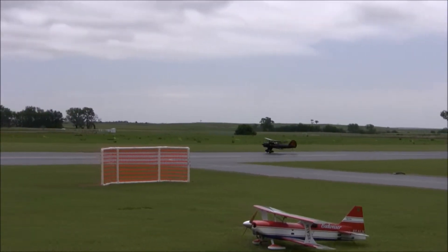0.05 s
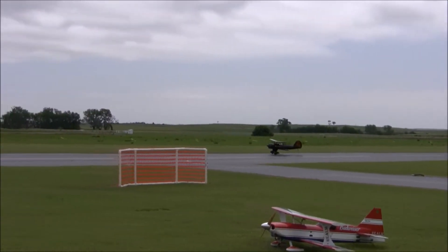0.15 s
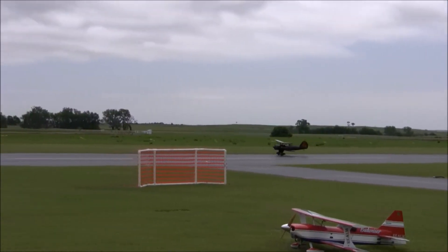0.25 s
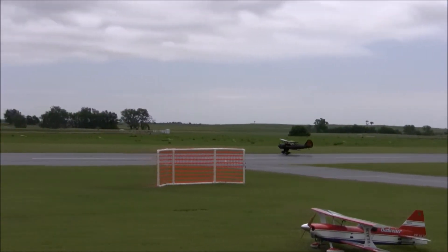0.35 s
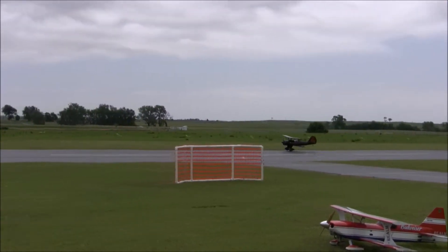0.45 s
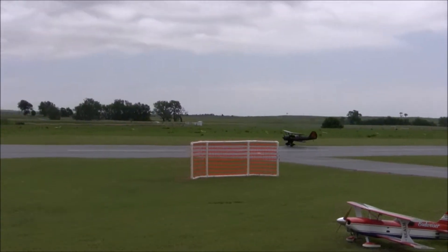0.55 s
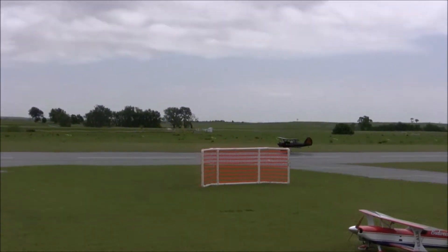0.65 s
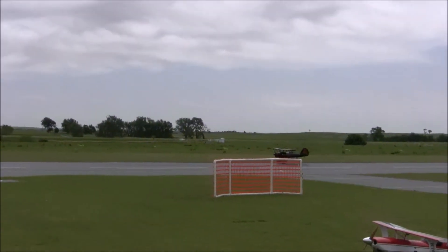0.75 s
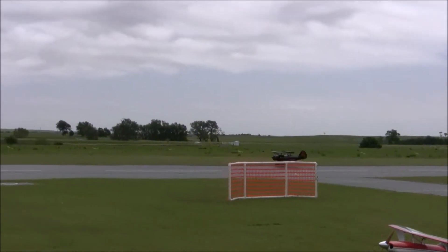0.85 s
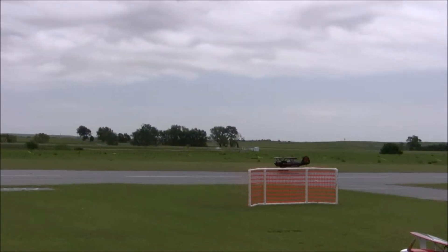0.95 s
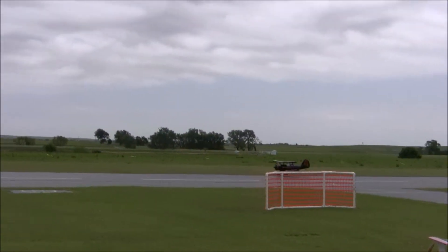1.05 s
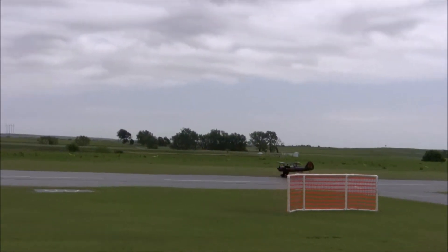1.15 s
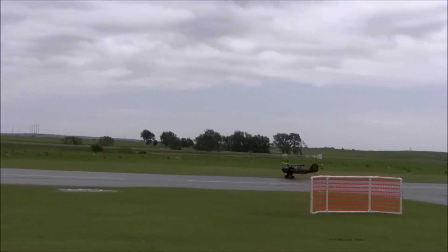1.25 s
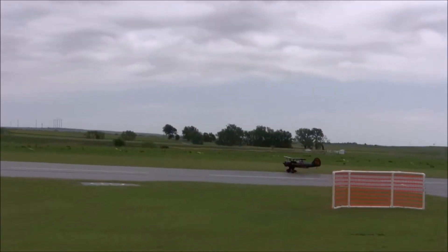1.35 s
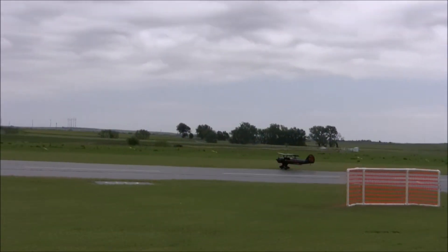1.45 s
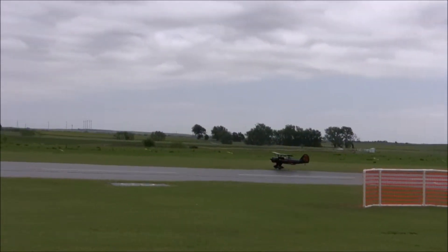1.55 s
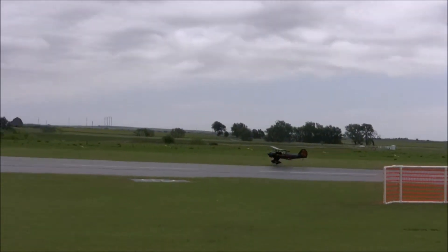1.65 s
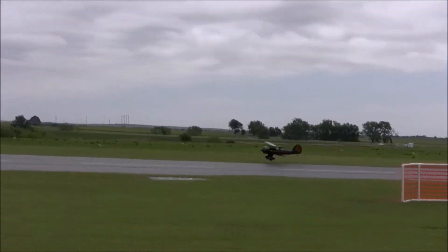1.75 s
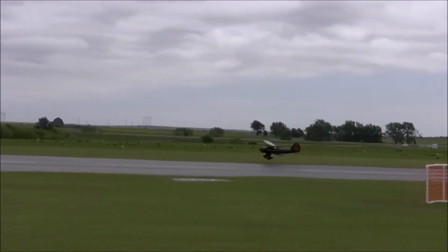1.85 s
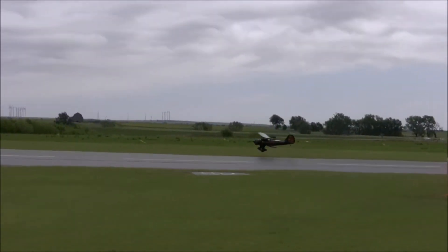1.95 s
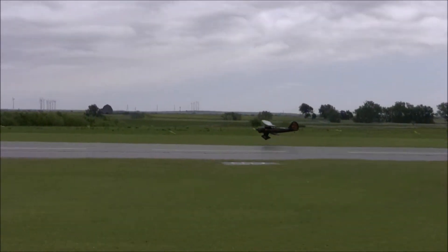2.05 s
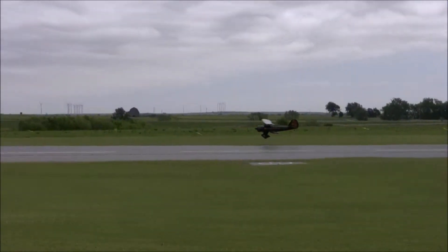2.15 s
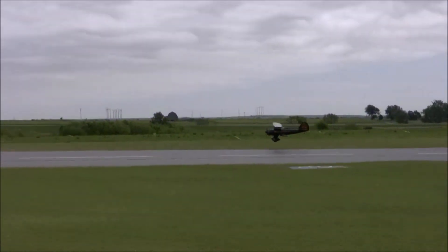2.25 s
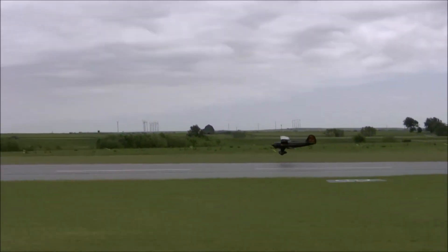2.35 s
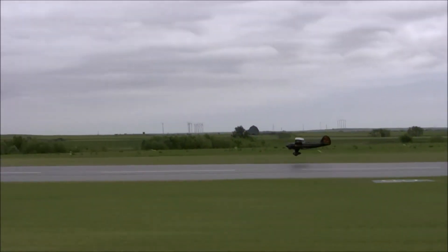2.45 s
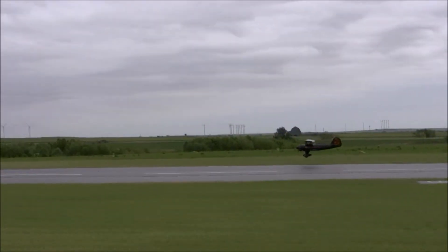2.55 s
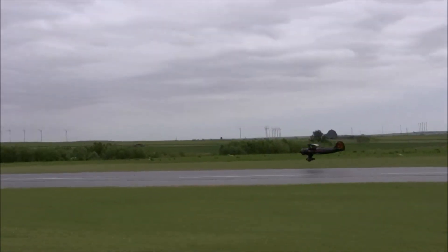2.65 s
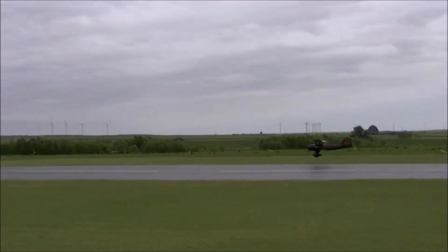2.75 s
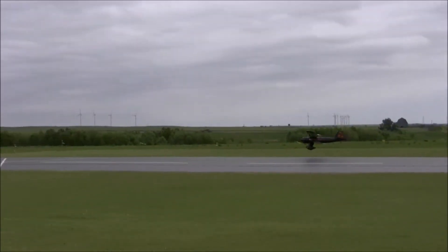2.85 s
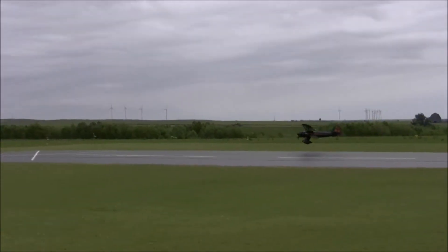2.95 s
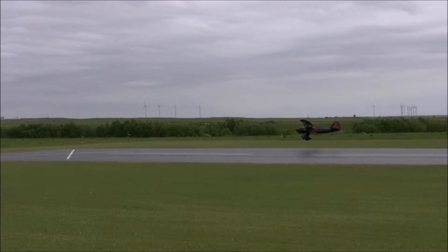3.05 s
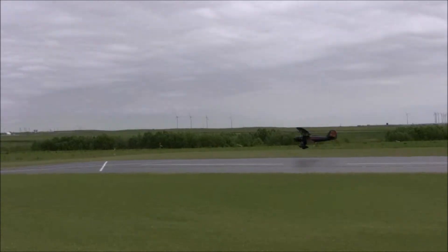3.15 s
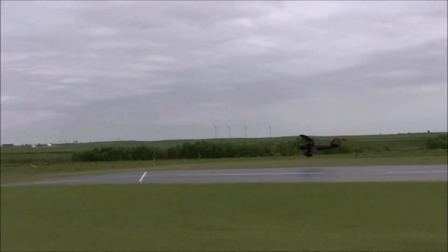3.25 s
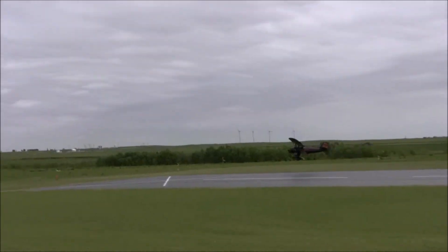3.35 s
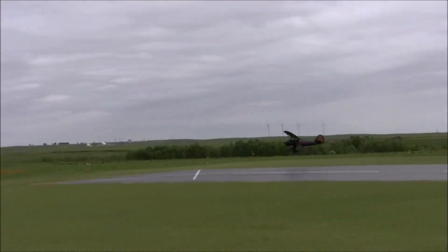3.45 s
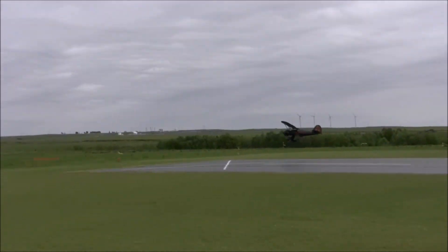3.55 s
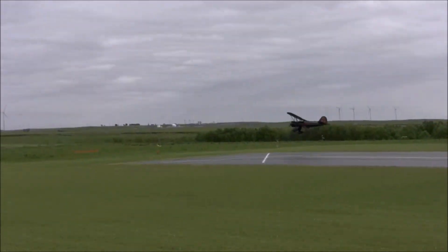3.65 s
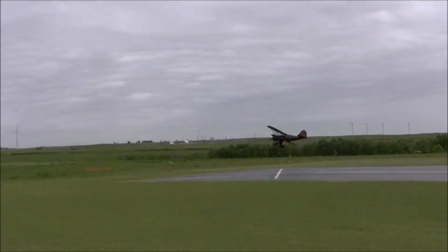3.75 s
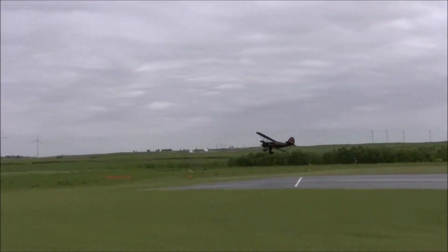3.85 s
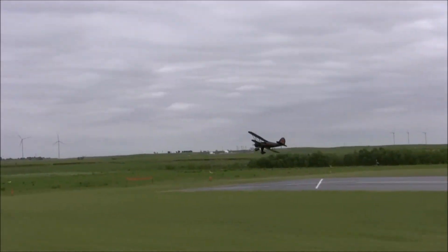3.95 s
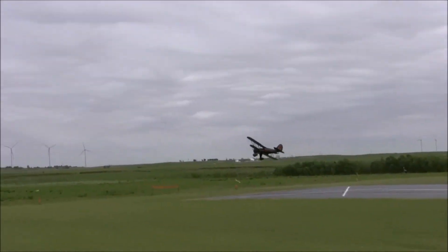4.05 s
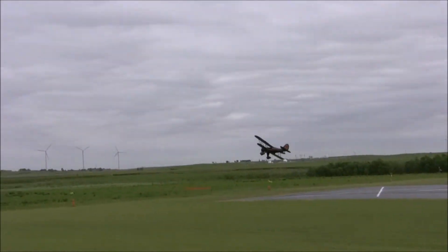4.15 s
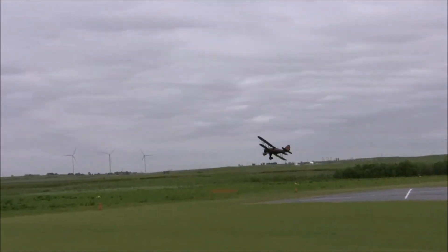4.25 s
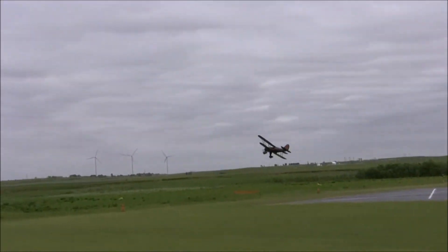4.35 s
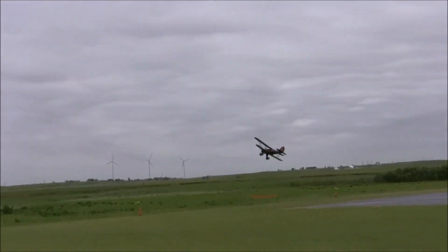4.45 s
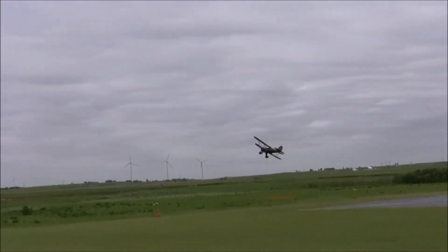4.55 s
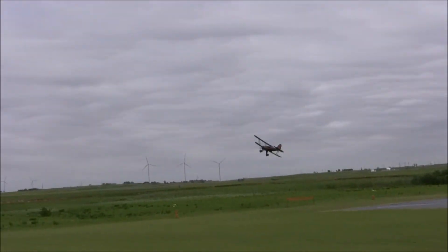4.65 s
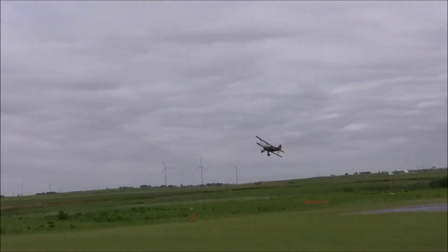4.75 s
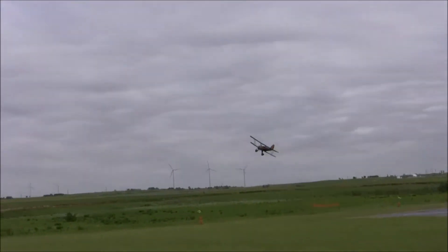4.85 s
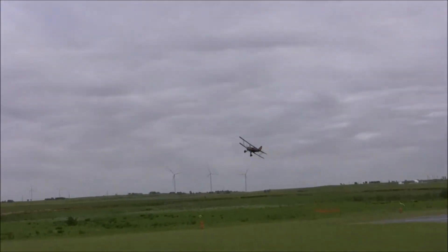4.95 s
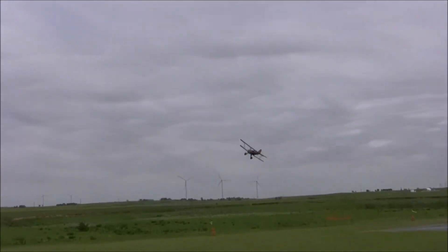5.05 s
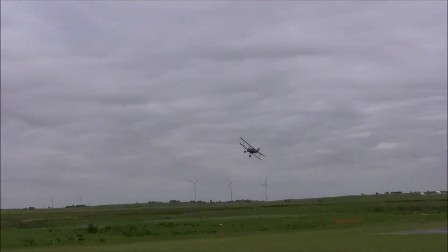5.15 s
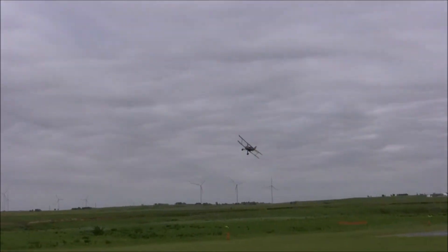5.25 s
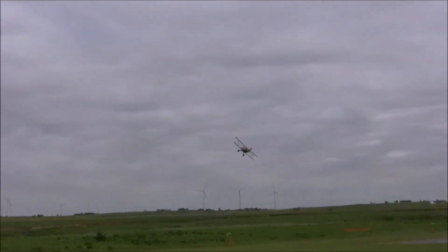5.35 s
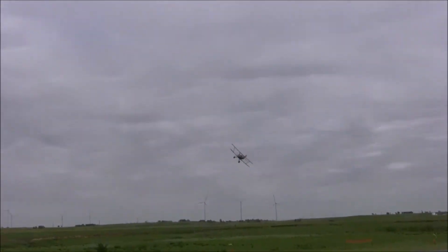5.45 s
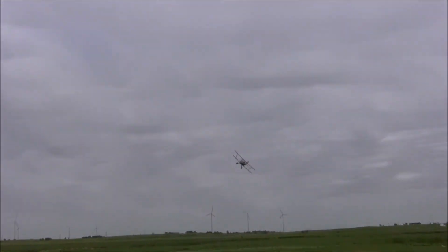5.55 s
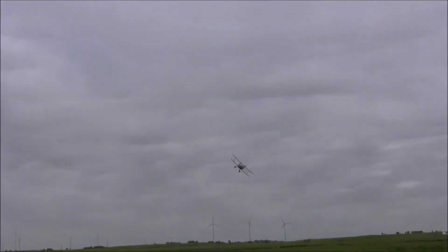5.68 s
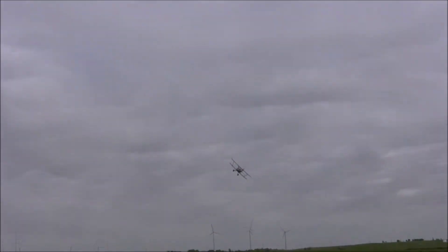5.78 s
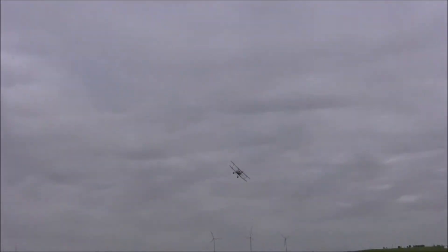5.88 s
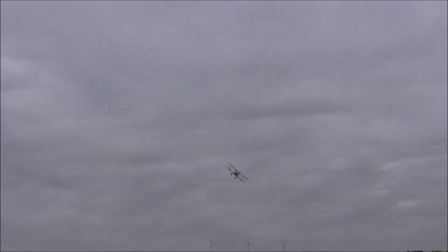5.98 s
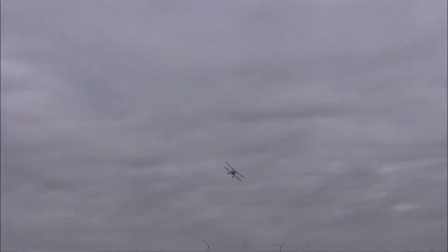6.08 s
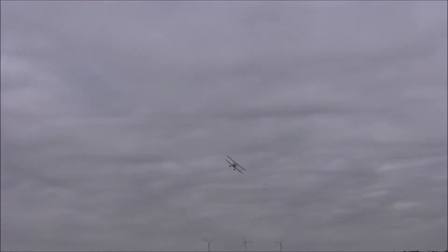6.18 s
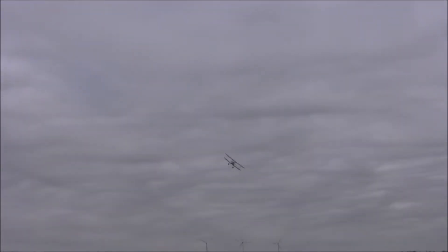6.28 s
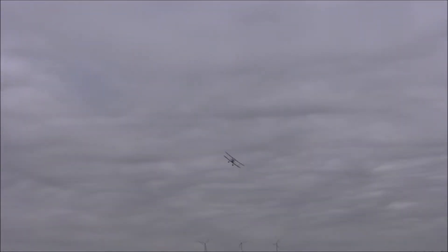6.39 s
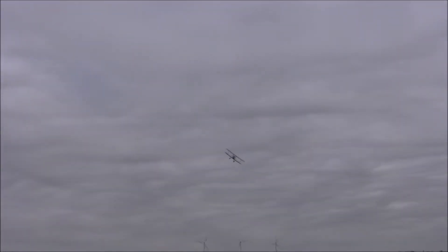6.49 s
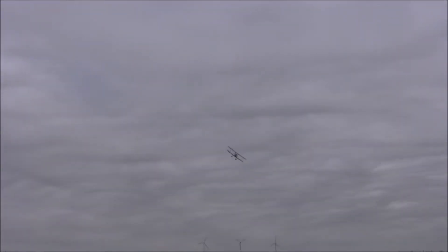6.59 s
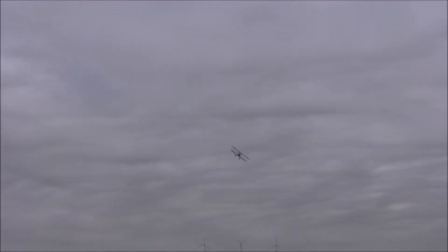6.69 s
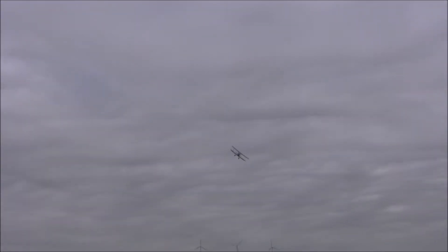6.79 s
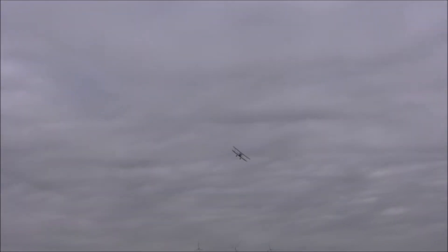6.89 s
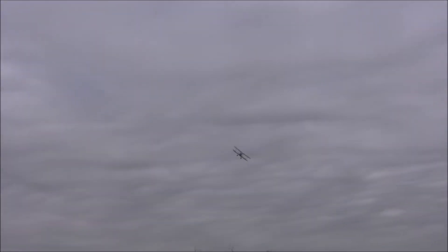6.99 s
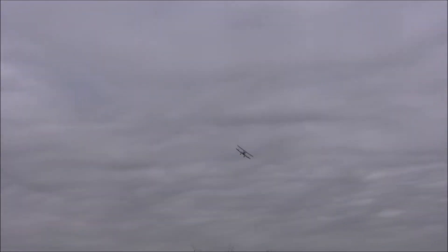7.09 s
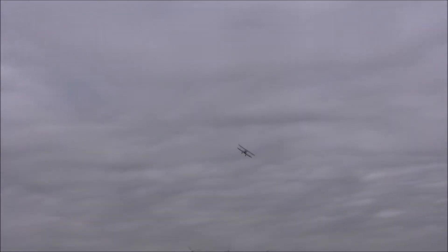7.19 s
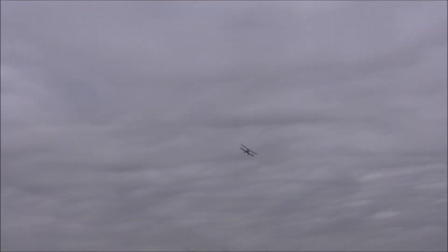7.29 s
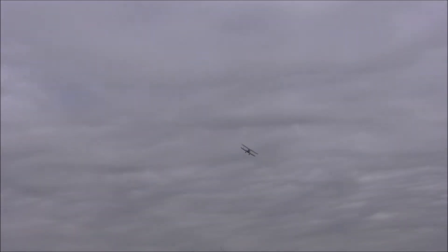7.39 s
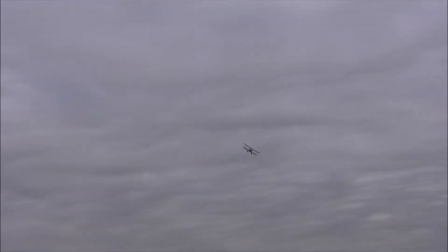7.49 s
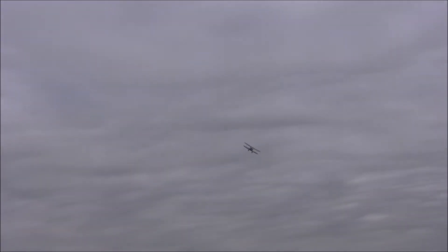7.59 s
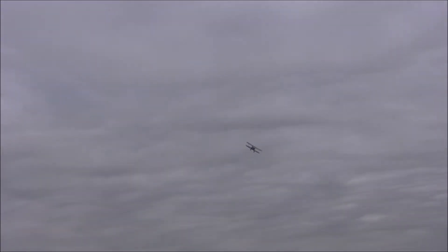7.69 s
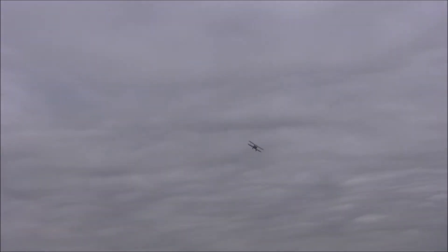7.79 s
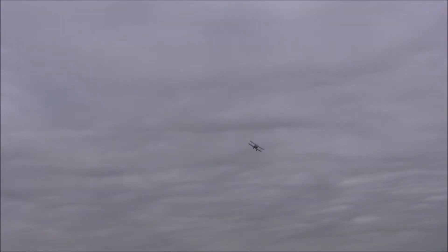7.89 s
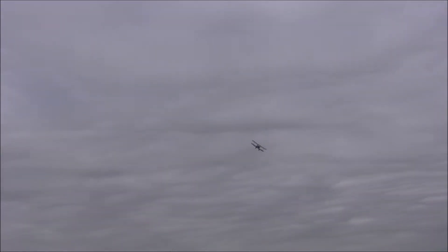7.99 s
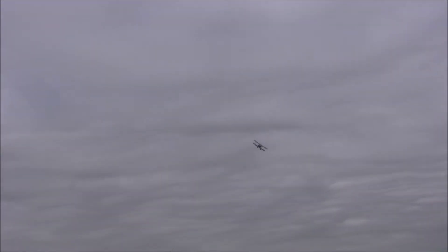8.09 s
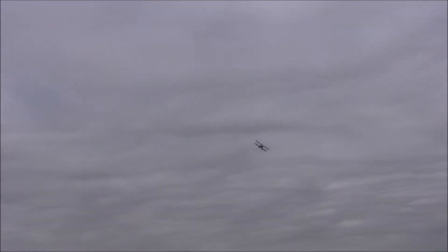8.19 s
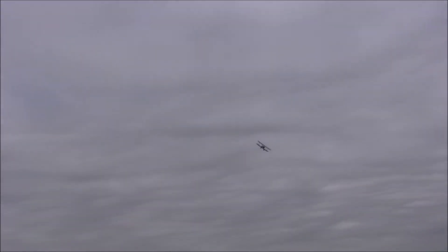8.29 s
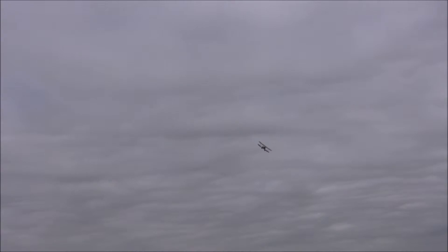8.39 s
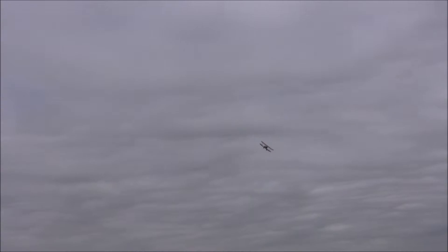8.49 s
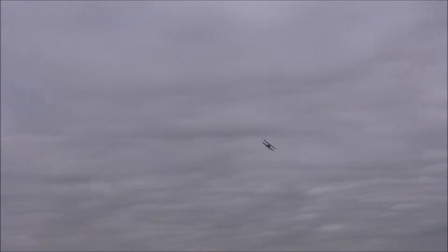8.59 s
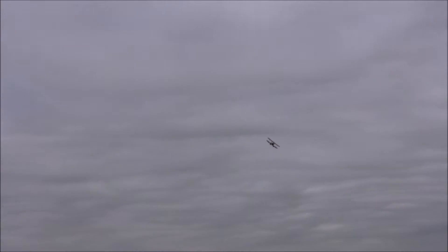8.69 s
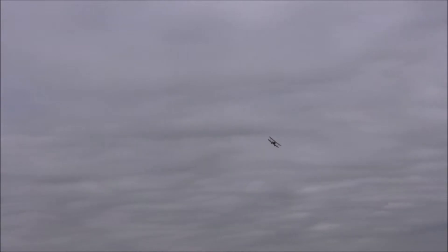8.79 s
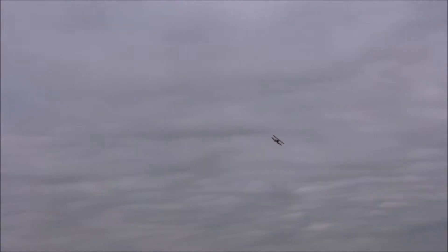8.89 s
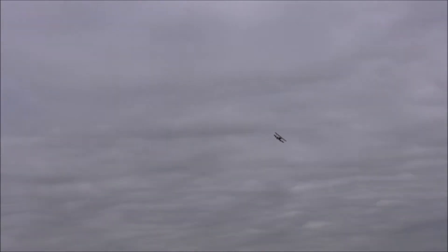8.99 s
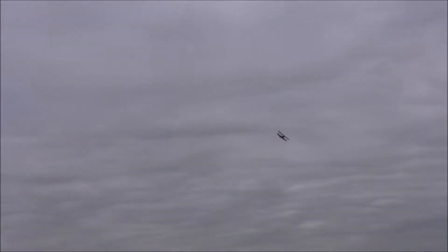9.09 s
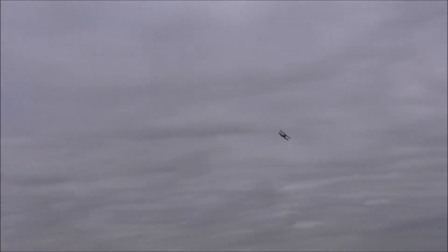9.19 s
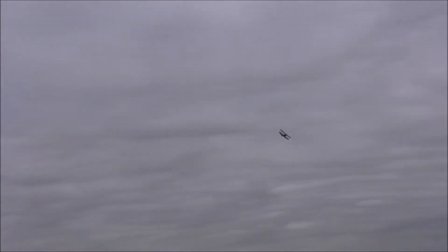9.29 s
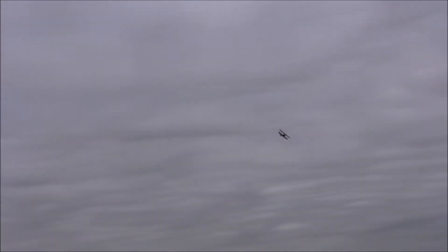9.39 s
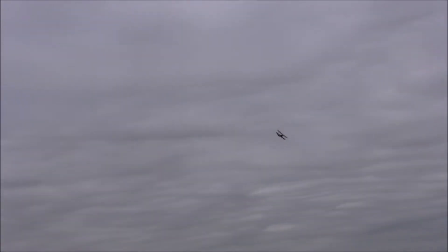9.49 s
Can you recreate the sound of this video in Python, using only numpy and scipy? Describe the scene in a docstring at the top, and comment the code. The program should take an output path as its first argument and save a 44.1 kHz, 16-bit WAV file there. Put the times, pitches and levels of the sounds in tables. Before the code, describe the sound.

Outdoors in an open field, an exposed stereo microphone catches hard, lumpy low wind gusts from about 0.2 to 2 seconds. Beneath them a small one-cylinder petrol model plane hums faintly, with weak ticking at first; its fast firing pitch climbs slightly from a low buzz around 80 pulses a second to just over 90. From 1.5 seconds it swells quickly, and between about 2.6 and 5 seconds it is loud and close, a steady droning buzz with sharp metallic crackle, rasp and hiss. A ground reflection colours the tone as it lifts off, and a breathy, hollow note appears around 4.6. After 5.3 the brightness falls away, leaving a duller drone near 7 seconds. Crackle briefly returns around 8.4, then fades again. From about 6 seconds deep wind rumble and soft thumps continue under faint distant hiss, with the engine still running at the end.

```python
"""A model airplane with a one-cylinder petrol engine gathers speed on a runway, passes, lifts off and climbs away.
Each firing gives a low exhaust pulse, built from engine orders, and a bright crack: muffler modes over a gas puff.
The ground returns an echo whose lag mostly grows as the plane climbs.
Wind, made of banded noise, buffets the microphones, hard at first, then as a low rumble."""
import sys
import numpy as np
from scipy import signal
from scipy.fft import next_fast_len
from scipy.io import wavfile
from scipy.ndimage import uniform_filter1d

SR = 44100
rng = np.random.default_rng(int(sys.argv[2]) if len(sys.argv) > 2 else 0)


def dump(signal):
    """Clip the signal to [-1, 1] and save it as 16-bit WAV at the path in sys.argv[1]."""
    limited = np.clip(np.atleast_2d(signal).T, -1, 1)
    pcm = np.round(limited * 32767).astype(np.int16)
    wavfile.write(sys.argv[1], SR, pcm)


N = 420273

# Wind gusts. Each row: start in seconds, length in seconds, level in dB.
GUSTS = [(.15, .04, -23.5), (.22, 0.19, -15.5), (.5, 0.31, -20), (.74, 0.11, -19), (.92, .11, -20.5),
         (1.19, 0.075, -23), (1.55, 0.17, -22.5), (1.78, 0.13, -21.5), (1.92, 0.2, -27.5),
         (2.12, 0.19, -35.5), (2.5, 0.15, -31), (2.91, 0.033, -27)]
# Gust spectrum. Each row: frequency in Hz, level in dB per Hz.
GUST_SPECTRUM = [(40, -26), (70, -20.5), (155, -1), (200, -3.5), (310, 2), (650, -8), (1200, -30),
                 (3000, -52)]
# Gust stereo. Each row: frequency in Hz, left-right likeness.
GUST_LIKENESS = [(60, 1), (300, 0.94), (700, 0.73), (1500, 0.24)]
GUST_RISE_DB_PER_S, GUST_FALL_DB_PER_S = 125, 120
LULL_DB, CALM_DB = -29.5, -41.5   # gust floor before the first gust, and after its start
# Low wind. Each row: time in seconds, level in dB before a 12 dB lift.
RUMBLE = [(0, -74), (2.3, -76), (3.0, -57), (4.3, -74), (5.8, -46.5), (9.53, -44)]
# Low wind spectrum. Each row: frequency in Hz, level in dB per Hz.
RUMBLE_SPECTRUM = [(25, -11.5), (50, -10.5), (90, -7), (140, -10.5), (250, -23.5), (500, -19)]
# Thumps of the low wind. Each row: start in seconds, length in seconds, level in dB before the same lift.
THUMPS = [(4.7, 0.021, -41), (6.2, .04, -43), (6.85, 0.031, -41), (7.22, 0.075, -34.5),
          (7.87, 0.051, -37.5), (8.22, .04, -39.5), (9.2, 0.084, -38), (9.37, 0.047, -35)]
THUMP_RISE_DB_PER_S, THUMP_FALL_DB_PER_S = 60, 162
# Far hiss spectrum. Each row: frequency in Hz, level in dB per Hz.
FIELD_SPECTRUM = [(760, -12), (1400, -15), (3500, -5.5), (4400, -1), (5200, -9), (6930, -15), (15600, -42)]
# Far hiss over the field. Each row: time in seconds, level in dB.
FIELD_LEVEL = [(0, -57), (6.3, -47), (9.53, -48)]

# Ground echo. Each row: time in seconds, lag in ms, strength 0-1.
GROUND = [(0, 0.49, 0.7), (1.9, 0.61, 0.8), (2.3, 0.56, 1), (3.9, 0.71, 1), (4.3, 0.96, 0.85),
          (4.7, 1.06, 0.97), (5.4, 1.243, 0.81), (6.0, 1.65, 0.66), (6.7, 1.84, 0.71), (8.6, 2.1, 0.61),
          (9.53, 2.17, 0.73)]
GRASS_TURNS = 0.15   # phase lag from soft ground, in cycles; not applied to the muffler ring
RING_ECHO = 0.37   # share of the echo strength that the muffler ring keeps

# Stereo place. Each row: time in seconds, left-right difference in dB of the low part, of the high part.
PLACE = [(0, .6, 0), (3.2, 0, -.3), (6, 1.7, 1), (7.5, 2.9, .5), (9.53, 2.0, .5)]
# Engine speed as heard. Each row: time in seconds, firings per second.
SPEED = [(0, 80.1), (.45, 80.2), (.9, 86.5), (1.1, 87.0), (1.25, 86.2), (1.75, 90.7), (2.25, 92.3),
         (2.5, 91.3), (3.05, 93.1), (3.75, 91.8), (4.2, 92.4), (5.25, 92.0), (5.65, 92.4), (5.8, 93.0),
         (7.0, 93.4), (8.3, 93.5), (8.6, 94.0), (9.53, 93.7)]
# Engine as heard. Each row: time in seconds, exhaust level in dB, dulling in dB an octave,
# lift of the blade tones in dB.
FLIGHT = [(0, -49.5, -1, 13), (1.0, -46.5, -2.5, 13.5), (1.5, -40.5, -2, 14), (2.2, -35.5, -2.5, 7.5),
          (2.6, -32, -2, 12.5), (3.14, -29, -3, 19.5), (3.4, -31.5, -3, 19.5), (3.85, -28, -3, 11.5),
          (4.2, -29.5, -2, 9.5), (4.6, -30, -3, 13.5), (5.2, -29.5, -4.5, 4.5), (6.0, -34.5, -6, 5),
          (7.0, -35.5, -6, 6.5), (8.5, -30.5, -6, -1), (9.53, -33.5, -4.5, 1)]

# Turbulence spectrum. Each row: frequency in Hz, level in dB per Hz.
ROAR_SPECTRUM = [(60, -2), (150, -7.5), (400, -14.5), (650, -14.5), (900, 10.5), (1300, -9.5), (2500, -2)]
PIPE_HZ, PIPE_WIDTH_HZ = 616, 27   # width of each of two passes
# Breathy pipe tone. Each row: time in seconds, level in dB.
PIPE_LEVEL = [(0, -83), (4.6, -29), (5.4, -28), (6.2, -31), (7.5, -39), (9.53, -47)]
# Tick on every second firing. Each row: time in seconds, level in dB.
TICK_LEVEL = [(0, -54), (.3, -52), (.37, -62), (.48, -48), (.6, -49), (.66, -80)]
TICK_HZ, TICK_WIDTH_HZ = 4600, 150

# Treble as the plane turns. Each row: time in seconds, crack level in dB, then in dB against it:
# upper orders (before a 6 dB cut), the six muffler modes from the lowest up.
TREBLE = [(0.0, -42.5, -17, -12, -11, -19, -17, -11, -21), (0.63, -41, -15, -10, -9, -9, -14, -17, -17),
          (0.72, -37, -7, -13, -6.5, -9, -10, -4.5, -17), (1.33, -41.5, -7, -9, -10, -11, -15, -11.5, -21),
          (1.54, -34, -3, -14, -10, -13, -11, -5.5, -12),
          (1.72, -26, -16.5, -14, -16.5, -19.5, -22, -9.5, -17),
          (2.57, -17, -12.5, -15.5, -3.5, -14.5, -18, -9, -10.5),
          (2.97, -14.5, -8.5, -6, -4, -12, -8, -10.5, -8.5),
          (3.34, -14.5, -6.5, -9, -12, -14, -36, -19, -12), (3.69, -14, -8.5, -22, -14.5, -8, -24, -6, -20),
          (4.14, -17.5, -13, -13, -1, -11.5, -13, -9.5, -27),
          (4.33, -15.5, -11, -9, -24, -0.5, -14, -3.5, -15),
          (4.51, -16.5, -7, -9, -12.5, -6, -9, -13.5, -16), (4.72, -15, -10, -12, -5.5, -18, -25, -15, -18),
          (4.94, -17, -7.5, -12, -15, -18, -10, -9, -19),
          (5.07, -19.5, -3.5, -7, -20, -11, -17, -14, -13.5),
          (5.28, -19.5, -8, -28, -6.5, -12, -6, -6.5, -11),
          (5.89, -24.5, -4, -7.5, -9, -8.5, -15, -11, -19), (6.05, -27, -6, -11, -7, -4.5, -8, -10.5, -18),
          (6.34, -35, -3.5, -5.5, -5, -15, -21, -14, -18), (7.01, -51.5, 0.5, -5, -15, -16, -12, -2, -17),
          (7.7, -38, -5, -3.5, -7.5, -10, -20, -14, -17), (7.91, -34.5, -10, -8, -3.5, -6, -20, -8, -18),
          (8.41, -26, -11.5, -14, -9.5, -10, -24, -5.5, -6), (8.73, -37.5, 2.5, 3, 0.5, -4, -14, -3, -11),
          (8.92, -34, -5.5, -4, -11, -3, -1, 1.5, -6.5), (9.53, -35.5, -5.5, -8, -3, -9, -15, -10, -14)]
# Treble flares. Each row: start in seconds, length in seconds, lift in dB.
FLARES = [(.72, 0.19, 4.5), (1.15, 0.092, 2.5), (1.47, 0.078, 7), (1.55, 0.01, 9.5), (8.28, 0.049, 1.5)]
FLARE_RISE_DB_PER_S, FLARE_FALL_DB_PER_S = 55, 136
# Gas noise under the muffler modes. Each row: frequency in Hz, level in dB per Hz.
GAS_SPECTRUM = [(2300, -25), (2900, -5), (3300, 2), (3600, -2), (4000, -24), (4350, -49), (4750, -4),
                (5100, -1), (5500, -6), (5900, -16), (6500, -27)]
GAS_SHARE = .26   # gain of the gas in the crack
# Crack hiss spectrum. Each row: frequency in Hz, level in dB per Hz.
HISS_SPECTRUM = [(5500, 3), (6800, -6), (8000, -6), (10500, -3.5), (12500, -9.5), (14500, -12),
                 (15700, -41)]
HISS_DB, HISS_LEFT_DB = -12.5, 1   # hiss against the crack; left above right
HISS_PER_FLARE_DB, HISS_PER_DULLING_DB, AIR_PER_DULLING_DB = 1.87, 0.77, 2.5   # dB per dB; air is the top
HISS_FLICKER_DB = 1.6   # spread, in the moving air
FAR_FROM_S, FAR_DB_PER_S = 7.8, -7   # the very top fades further as the plane recedes
CLEAR_ABOVE_DB, BLUR_PER_DB = -44, 0.06   # a fainter crack keeps less of its ring
PUFF_TURNS, PUFF_FLOOR = .33, .18   # burst decay in shaft turns; constant flow added to the burst
# Muffler modes struck by each firing. Each row: frequency in Hz, decay in ms.
MUFFLER = [(2640, 2.8), (3020, 1.9), (3560, 1.8), (4680, 2.8), (5070, 2.0), (5750, 1.3)]
# Mode glide as the plane turns. Each row: time in seconds, pitch shift in % of the second mode,
# of the fifth and sixth modes.
GLIDE = [(1.6, 0, 2), (1.9, -5, 2), (2.6, -2, 1.5), (3.0, -1, -1), (4.3, -1.5, -3), (5.3, 1.5, -2.5),
         (5.8, -7, -3.5), (6.05, 3, -3.5), (6.7, -12, -2.5), (7.5, -11, -2.5), (8.0, 0, -2.5),
         (9.53, -6, -3)]
MODE_RISE_MS = 0.98
MODE_WANDER, MODE_JITTER = .008, .002   # pitch spread as shares: slow, firing to firing
MODE_WAVER_DB, MODE_SWAY_DB = 2.0, 4.5   # spread of the slow swell, of the left-right difference

# Orders one to four, level in dB against the tilted exhaust level; two and four are the blade tones.
LOW_DB = [-10, 0.65, 4.5, -1.5]
# Share of the blade lift that each of orders one to four takes.
BLADE_SHARE = [-0.23, 0.62, 0.016, 0.84]
NOTE_DB, BRIGHT_DB = 8, 5   # note and bright half against the tilted exhaust level
NOTE_OPENS_S, NOTE_OPENS_IN_S, NOTE_OPENS_DB = 4.42, 0.15, 4   # as the tail turns to the listener; dB either way
# Order phase as the plane turns. Each row: time in seconds, phase advance in cycles per order above the second.
LEAD = [(0, -.22), (3.4, -.2), (4.0, .38), (5.2, .34), (5.8, .08), (6.6, .02), (9.53, .05)]
# Orders five to seven. Each row: frequency in Hz, level in dB an order.
NOTE_SPECTRUM = [(560, 7), (650, 5)]
# Fifth order. Each row: time in seconds, level in dB against the note.
FIFTH = [(0, -4), (3.8, -8), (4.4, -1.5), (6.0, -9), (7.4, -11.5), (9.53, -13.5)]
# Orders eight to fifteen, read at 1/0.93 of their pitch. Each row: frequency in Hz, level in dB an order.
BRIGHT_SPECTRUM = [(740, -2), (830, 0), (930, -2), (1030, -6)]
# Swells of orders eight and nine. Each row: start in seconds, length in seconds, lift in dB.
BRIGHT_SWELL = [(3.75, 1.47, 7), (6.7, 0.93, 2.5)]
SWELL_DB_PER_S = 24
# Higher orders against the bright half. Each row: time in seconds, orders ten and eleven in dB,
# orders twelve to fifteen in dB.
HIGHER = [(0.6, 2.5, -11.5), (2.1, -2, -22), (3.0, -4.5, -10), (3.84, -2, -6), (4.6, -8.5, -2),
          (5.3, -9, -6.5), (7.0, -7.5, -18), (9.53, -4.5, -14.5)]
# Orders sixteen to twenty-four, read at 1/0.97 of their pitch, and the rasp noise.
# Each row: frequency in Hz, level in dB (an order, or per Hz for the rasp).
UPPER_SPECTRUM = [(1100, -6), (1400, -4.5), (1800, -5), (2000, 2.5), (2250, -15)]

STOPBAND_HZ = 15900
SIDES = np.array([[.5], [-.5]])   # shares a left-right difference in dB between the channels


def from_db(db):
    """Decibels to gain."""
    return 10 ** (np.asarray(db) / 20)


def rms_one(x):
    """Scaled to rms 1."""
    return x / np.sqrt(np.mean(x ** 2) + 1e-20)


def in_time(rows):
    """Each column of a table as a curve over all samples."""
    s, *columns = np.transpose(rows)
    return [np.interp(np.arange(N) / SR, s, column) for column in columns]


def at_hz(points, hz):
    """A spectrum read on a log-frequency axis."""
    point_hz, value = np.array(points).T
    return np.interp(np.log(hz), np.log(point_hz), value)


def humps(rows, rise_db_per_s, fall_db_per_s):
    """Rows of start, length and dB, each held and flanked by slopes; the highest counts."""
    t = np.arange(N) / SR
    levels_db = []
    for start_s, length_s, db in rows:
        before_db = rise_db_per_s * (start_s - t)
        after_db = fall_db_per_s * (t - start_s - length_s)
        levels_db.append(db - np.maximum(0, np.maximum(before_db, after_db)))
    return np.max(levels_db, axis=0)


def drift(rate_hz):
    """Slow chance: noise through a double low-pass pole, made every 200 samples; spread 1."""
    r = np.exp(-400 * np.pi * rate_hz / SR)
    noise = rng.standard_normal(N // 200 + 402)
    slow = signal.lfilter([1], [1, -2 * r, r * r], noise)[400:]   # past the filter's settling
    return np.interp(np.arange(N) / 200, np.arange(len(slow)), rms_one(slow))


def resonance(x, hz, width_hz):
    """Two-pole peak with gain 1 on top."""
    r = np.exp(-np.pi * width_hz / SR)
    poles = [1, -2 * r * np.cos(2 * np.pi * hz / SR), r * r]
    return signal.lfilter([(1 - r * r) / 2, 0, (r * r - 1) / 2], poles, x)


def split(x, hz):
    """The parts below and above a frequency."""
    below = signal.sosfiltfilt(signal.butter(2, hz, fs=SR, output="sos"), x)
    return below, x - below


def coloured(spectrum, likeness, patchy_db, rate_hz):
    """Bands of stereo noise, each with its own level, flicker and likeness; rms 1."""
    lowest_hz = spectrum[0][0]
    octaves = np.log2(spectrum[-1][0] / lowest_hz)
    step = min(.5, octaves / 6)   # octaves a band
    edges = lowest_hz * 2 ** np.arange(0, octaves + step, step)
    out, together, white = 0, drift(rate_hz), rng.standard_normal((2, 2, N))
    for k, (low, high) in enumerate(zip(edges, np.minimum(edges[1:], .45 * SR))):
        band = signal.butter(2, [low, high], "band", fs=SR, output="sos")
        mid, side = signal.sosfilt(band, white[k % 2])   # neighbours use separate noise
        centre_hz = np.sqrt(low * high)
        alike = np.clip(at_hz(likeness, centre_hz), -1, 1)
        gain = from_db(at_hz(spectrum, centre_hz) + patchy_db * (together + drift(rate_hz)))
        out = out + gain * (np.sqrt(1 + alike) * mid + np.sqrt(1 - alike) * side * [[1], [-1]])
    return rms_one(out)


def wind():
    """Lumpy buffeting that both microphones share, a rumble partly in opposition, and a far hiss."""
    lull_db = np.where(np.arange(N) / SR < GUSTS[0][0], LULL_DB, CALM_DB)
    gust_db = np.maximum(humps(GUSTS, GUST_RISE_DB_PER_S, GUST_FALL_DB_PER_S), lull_db)
    gusts = from_db(gust_db) * coloured(GUST_SPECTRUM, GUST_LIKENESS, patchy_db=1.5, rate_hz=40)
    thump_db = humps(THUMPS, THUMP_RISE_DB_PER_S, THUMP_FALL_DB_PER_S)
    rumble_db = np.maximum(thump_db, in_time(RUMBLE)[0]) + 12.0
    rumble = coloured(RUMBLE_SPECTRUM, [(30, 0.019), (150, -0.78)], patchy_db=2.2, rate_hz=16)
    field = coloured(FIELD_SPECTRUM, [(1500, 0.93), (12000, 0.34)], patchy_db=0.8, rate_hz=6.4)
    return gusts + from_db(rumble_db) * rumble + from_db(in_time(FIELD_LEVEL)[0]) * field


def ground_echo(hz, echo_hz):
    """Direct sound plus ground echo at a gliding pitch, as gain and phase shift."""
    coarse = slice(None, None, 40)
    lag_ms, strength = [curve[coarse] for curve in in_time(GROUND)]
    hz = hz[coarse]
    returned = np.clip(strength, 0, .97) / (1 + (hz / echo_hz) ** 2)   # grass returns little treble
    total = 1 + returned * np.exp(-2j * np.pi * (hz * lag_ms / 1000 + GRASS_TURNS))
    return [np.interp(np.arange(N), np.arange(0, N, 40), v) for v in (np.abs(total), np.angle(total))]


def delayed_echo(x):
    """The ground's reflection of a stereo sound: a gliding lag and strength."""
    lag_ms, strength = in_time(GROUND)
    late = np.arange(N) - lag_ms * SR / 1000
    return np.clip(strength, 0, 1) * np.array([np.interp(late, np.arange(N), channel) for channel in x])


def uneven(turns, spread_db):
    """No two firings are quite as strong."""
    firing = np.floor(turns + .5).astype(int)
    return uniform_filter1d(from_db(spread_db * rng.standard_normal(N)[firing]), size=60)


def puffs(turns):
    """Gas leaves in a burst that decays until the next firing, over a constant flow."""
    return uneven(turns, spread_db=1.0) * (np.exp(-((turns + .1) % 1) / PUFF_TURNS) + PUFF_FLOOR)


def roar(note_db, bright_db):
    """Turbulent exhaust and slipstream fill the gaps between the orders and take a ground echo."""
    noise = coloured(ROAR_SPECTRUM, [(100, 1.0), (5000, 0.73)], patchy_db=1.5, rate_hz=4.4)
    analytic = signal.hilbert(noise, next_fast_len(N))[:, :N]
    turned = np.real(analytic * np.exp(-2j * np.pi * GRASS_TURNS))
    dull, sharp = split(noise + delayed_echo(turned), 690)
    return from_db(note_db - 4.5) * dull + from_db(bright_db - 9.0) * sharp


def pipe():
    """Gas flow sounds a narrow resonance between two orders."""
    tone = resonance(rng.standard_normal(N), PIPE_HZ, PIPE_WIDTH_HZ)
    tone = resonance(tone, PIPE_HZ, PIPE_WIDTH_HZ)
    return from_db(in_time(PIPE_LEVEL)[0]) * rms_one(tone)


def tick(turns):
    """A short bright ring, once in two turns."""
    clicks = (np.diff(np.floor(turns / 2), prepend=0) > 0) * uneven(turns, spread_db=3.0)
    return from_db(in_time(TICK_LEVEL)[0]) * rms_one(resonance(clicks + 1e-18, TICK_HZ, TICK_WIDTH_HZ))


def muffler(turns, per_s, modes_db):
    """Each firing strikes the muffler's modes, which ring out within a few milliseconds."""
    firing = np.floor(turns + .1).astype(int)
    since_ms = 1000 * ((turns + .1) % 1) / per_s
    second, upper = np.array(in_time(GLIDE)) / 100
    chance, out = rng.standard_normal((firing.max() + 1, len(MUFFLER), 2)), 0
    for k, (hz, decay_ms) in enumerate(MUFFLER):
        glide = second * (k == 1) + upper * (k >= 4)
        pitch_hz = hz * (1 + glide + MODE_WANDER * drift(1.2) + MODE_JITTER * chance[firing, k, 0])
        shape = np.exp(-since_ms / decay_ms) * (1 - np.exp(-since_ms / MODE_RISE_MS))
        size_db = modes_db[k] + MODE_WAVER_DB * drift(4.1) + .5 * chance[firing, k, 1]
        size = from_db(size_db + MODE_SWAY_DB * drift(2.2) * SIDES)
        out = out + size * rms_one(shape * np.sin(2 * np.pi * pitch_hz * since_ms / 1000))
    return out


def crack(turns, per_s, crack_db, modes_db, hiss_db, air_db):
    """The port opens: the muffler rings over a dying puff of gas."""
    clear = np.clip(0.59 + BLUR_PER_DB * np.minimum(crack_db - CLEAR_ABOVE_DB, 0), .1, 1)
    puff = puffs(turns)
    gas = rms_one(puff * coloured(GAS_SPECTRUM, [(2300, 1.0), (6500, 0.7)], patchy_db=0.5, rate_hz=5.3))
    noise = coloured(HISS_SPECTRUM, [(6000, 0.84), (15000, 0.42)], patchy_db=1.26, rate_hz=25.0)
    hiss, air = split(rms_one(puff * uneven(turns + 0.36, spread_db=0.9) * noise), 9800)
    hiss = hiss + air * from_db(air_db)   # the air eats the very top
    ring = muffler(turns, per_s, modes_db)
    ring = ring + RING_ECHO * delayed_echo(ring)
    body = from_db(crack_db) * (clear * ring + GAS_SHARE * gas)
    return body + from_db(hiss_db + HISS_LEFT_DB * SIDES) * hiss


def engine_levels(per_s):
    """Levels of the four low orders, the note and its bright half; dulling pivots on the fourth order."""
    level_db, dulling_db, blade_db = in_time(FLIGHT)
    tilted = [level_db + dulling_db * np.log2(order / 4) for order in (1, 2, 3, 4, 6, 9)]
    opens_db = NOTE_OPENS_DB * np.tanh((np.arange(N) / SR - NOTE_OPENS_S) / NOTE_OPENS_IN_S)
    low = []
    for k in range(4):
        echo_gain, _ = ground_echo((k + 1) * per_s, echo_hz=3000)
        low.append(tilted[k] + LOW_DB[k] + blade_db * BLADE_SHARE[k] + 20 * np.log10(echo_gain))
    return low, tilted[4] + NOTE_DB + opens_db, tilted[5] + BRIGHT_DB, dulling_db


def orders(turns, per_s, which, spectrum, waver_db, scatter, echo_hz, lead, pitch_scale):
    """Engine orders, each met by its ground echo and wavering in level and timing; rms 1 before the echo."""
    out, power, shared = 0, 0, drift(1.0)
    for k in which:
        shared = 0.6 * shared + 0.9 * drift(2.5)   # neighbouring orders swell together
        size = from_db(at_hz(spectrum, k * (per_s / pitch_scale)[::40]) + waver_db * shared[::40])
        size = np.interp(np.arange(N), np.arange(0, N, 40), size)
        gain, shift = ground_echo(k * per_s, echo_hz)
        cycles = k * turns + (k - 2) * lead + scatter * drift(1.12)
        out = out + size * gain * np.cos(2 * np.pi * cycles + shift)
        power = power + size ** 2 / 2
    return out / np.sqrt(power)


def tones(turns, per_s, levels_db, note_db, bright_db, upper_db):
    """Low orders are near sines; above them the exhaust note and its rasping upper orders."""
    lead, = in_time(LEAD)
    ahead = [.22, -.05, lead, 2 * lead]
    low = 0
    for k, db in enumerate(levels_db):
        low = low + np.sqrt(2) * from_db(db) * np.cos(2 * np.pi * ((k + 1) * turns + ahead[k]))

    fifth, rest = [orders(turns, per_s, which, NOTE_SPECTRUM, waver_db=3.0, scatter=0.04,
                          echo_hz=3020, lead=lead, pitch_scale=1.0)
                   for which in (range(5, 6), range(6, 8))]
    note = from_db(in_time(FIFTH)[0]) * fifth + rest

    swell_db = np.maximum(humps(BRIGHT_SWELL, SWELL_DB_PER_S, SWELL_DB_PER_S), 0)
    groups = [orders(turns, per_s, which, BRIGHT_SPECTRUM, waver_db=2.5, scatter=0.04,
                     echo_hz=3000, lead=lead, pitch_scale=0.93)
              for which in (range(8, 10), range(10, 12), range(12, 16))]
    bright = from_db(swell_db - 0.5) * groups[0]
    for db, group in zip(in_time(HIGHER), groups[1:]):
        bright = bright + from_db(db) * group

    upper = orders(turns, per_s, range(16, 25), UPPER_SPECTRUM, waver_db=3.0, scatter=0.15,
                   echo_hz=1130, lead=0, pitch_scale=0.97)
    noise = coloured(UPPER_SPECTRUM, [(1100, 1.0), (2300, 0.67)], patchy_db=1.5, rate_hz=21.0)
    rasp = rms_one(puffs(turns) * noise)
    exhaust = from_db(note_db) * note + from_db(bright_db) * bright + from_db(upper_db - 6.0) * upper
    return low + uneven(turns, spread_db=0.75) * exhaust + from_db(upper_db - 9.0) * rasp


def scene():
    """The plane, placed left or right, in the wind."""
    per_s, = in_time(SPEED)
    levels_db, note_db, bright_db, dulling_db = engine_levels(per_s)
    treble_db, upper_db, *modes_db = in_time(TREBLE)
    flare_db = np.maximum(humps(FLARES, FLARE_RISE_DB_PER_S, FLARE_FALL_DB_PER_S), 0) + 0.72 * drift(12.0)
    hiss_db = treble_db + HISS_DB + HISS_PER_FLARE_DB * flare_db
    hiss_db = hiss_db + HISS_PER_DULLING_DB * dulling_db + HISS_FLICKER_DB * drift(9.6)
    far_db = FAR_DB_PER_S * np.maximum(np.arange(N) / SR - FAR_FROM_S, 0)
    air_db = AIR_PER_DULLING_DB * dulling_db + far_db
    turns = np.cumsum(per_s * (1 + 0.0003 * drift(8.8) + .0015 * drift(1.5))) / SR   # one firing a turn

    low = tones(turns, per_s, levels_db, note_db, bright_db, treble_db + upper_db)
    low = low + roar(note_db, bright_db) + pipe()
    high = crack(turns + 0.051, per_s, treble_db + flare_db, modes_db, hiss_db, air_db) + tick(turns)
    low_pan_db, high_pan_db = in_time(PLACE)
    return low * from_db(SIDES * low_pan_db) + high * from_db(SIDES * high_pan_db) + wind()


def record(dry):
    """The loudest peaks are rounded, the top is cut."""
    rounded = dry / (1 + np.abs(dry / .95) ** 4) ** (1 / 4)
    return signal.sosfilt(signal.cheby2(16, 70, STOPBAND_HZ, fs=SR, output="sos"), rounded)


dry = scene()
out = record(dry)
dump(out)
```